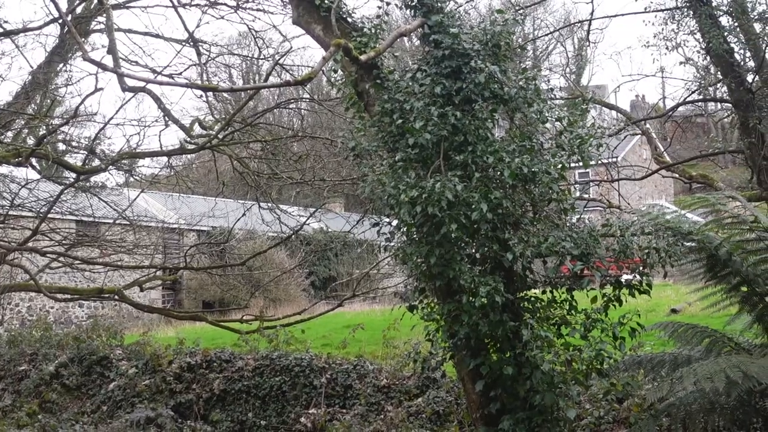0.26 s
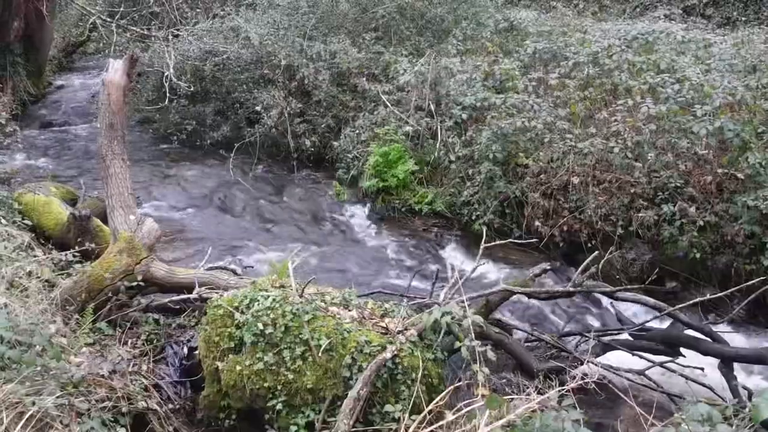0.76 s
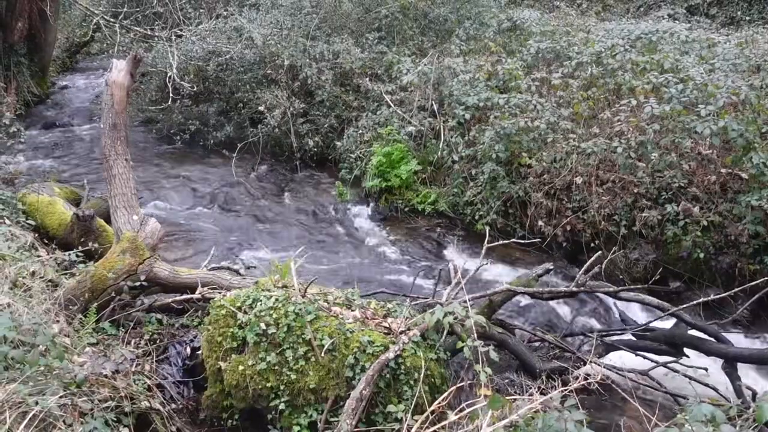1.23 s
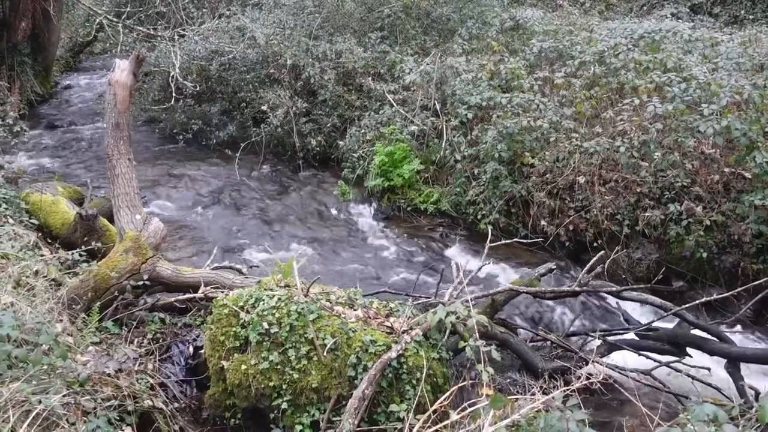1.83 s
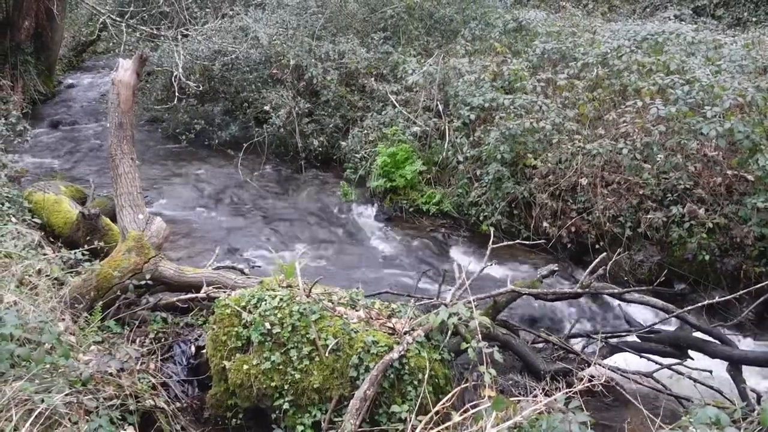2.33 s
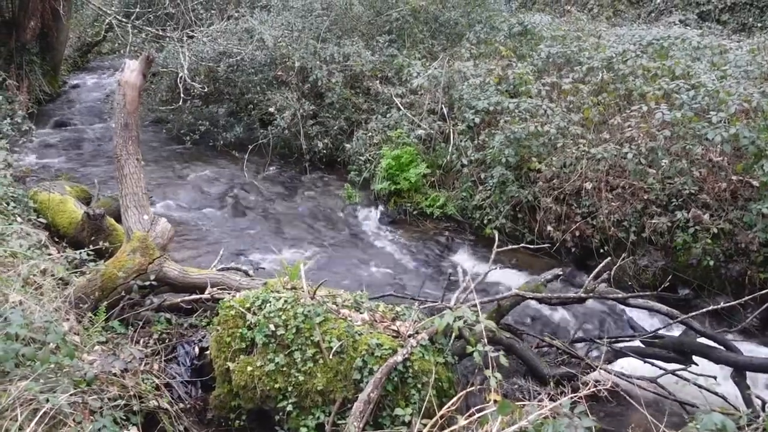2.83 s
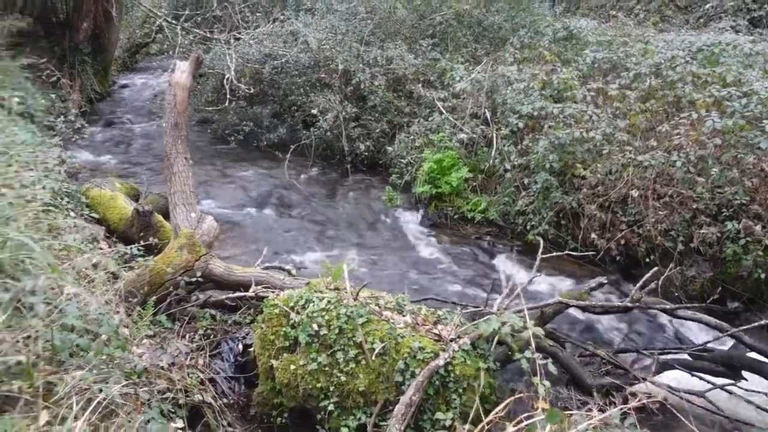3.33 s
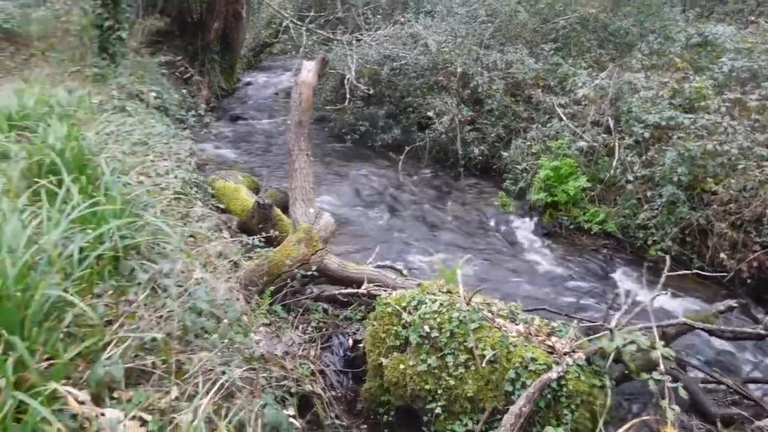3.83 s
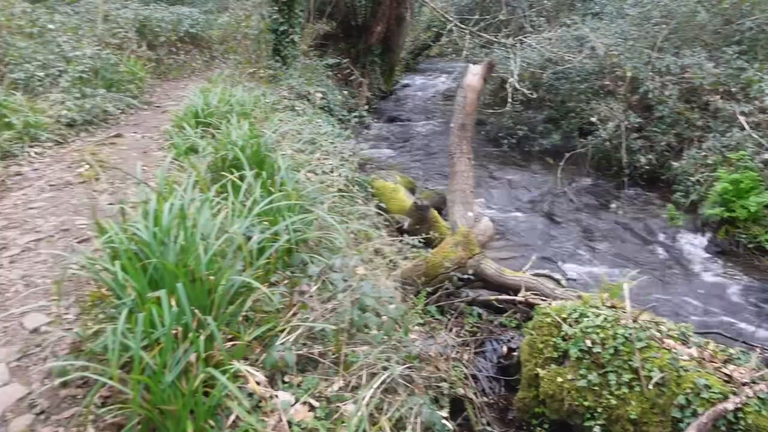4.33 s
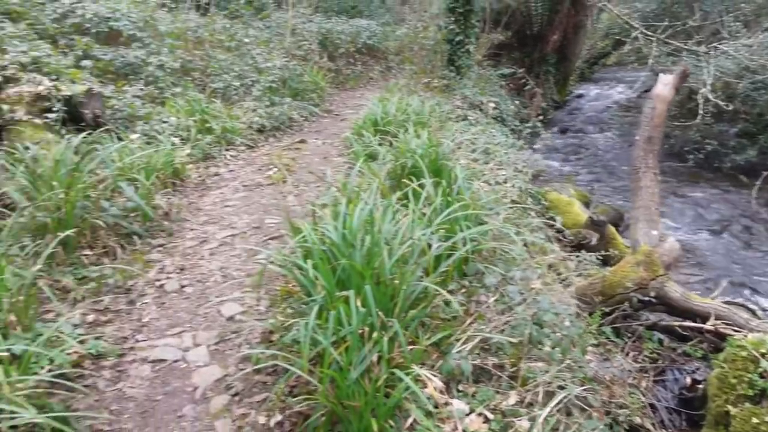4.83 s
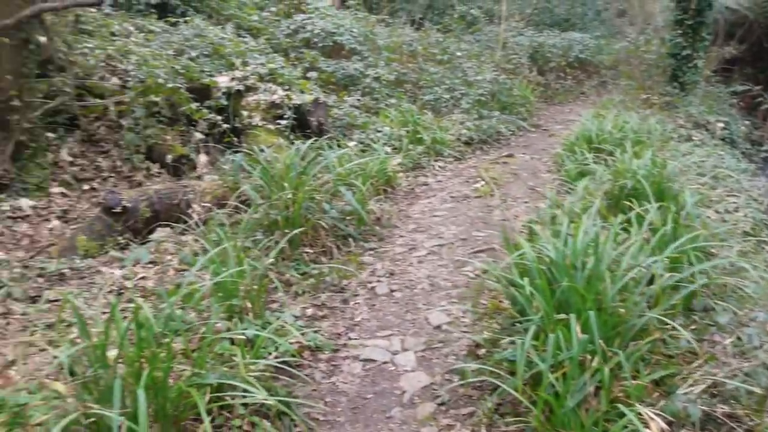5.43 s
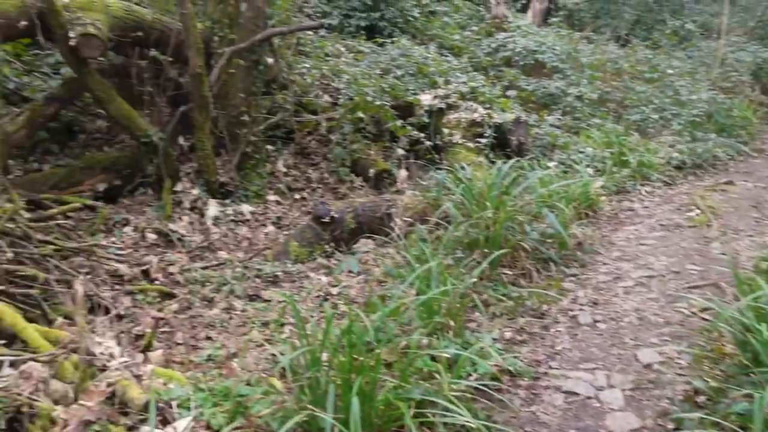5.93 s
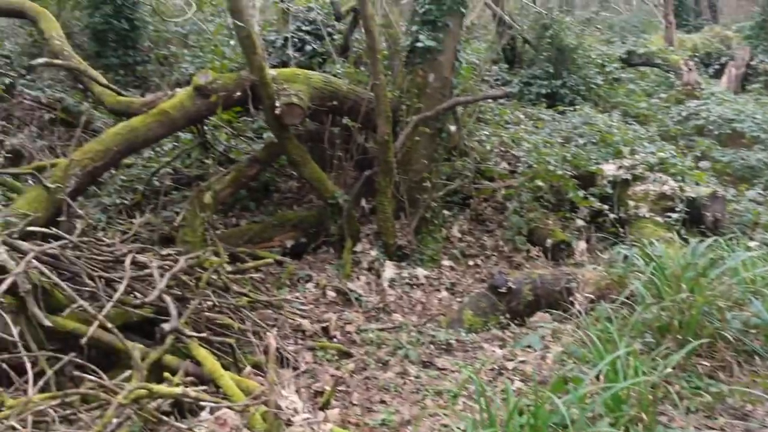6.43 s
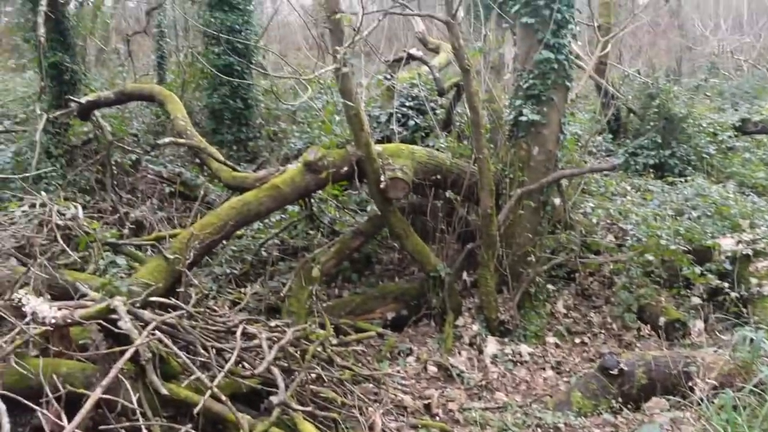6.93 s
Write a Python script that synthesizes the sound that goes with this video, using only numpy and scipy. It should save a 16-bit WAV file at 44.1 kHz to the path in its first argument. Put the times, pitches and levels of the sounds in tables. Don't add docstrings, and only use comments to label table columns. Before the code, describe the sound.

Continuous rushing water outdoors, heard through a camera with the bass cut. A short opening from the bank dips almost silent at half a second, then brighter, louder stream sound returns from close by. Rounded bubble gurgles, light rock splashes and tiny drop or twig ticks poke out of the dense rush. As the view swings toward the path and trees, the stream leans strongly right, loses treble and softens gradually.

```python
import sys
import numpy as np
from scipy import signal
from scipy.fft import rfft, irfft
from scipy.io import wavfile
from scipy.ndimage import uniform_filter1d, map_coordinates

SR = 44100
rng = np.random.default_rng(int(sys.argv[2]) if len(sys.argv) > 2 else 0)


def log_audio(samples):
    frames = np.atleast_2d(samples).T
    limited = np.clip(frames, -1, 1)
    pcm = np.round(limited * 32767).astype(np.int16)
    wavfile.write(sys.argv[1], SR, pcm)


def gain_from_db(level_db):
    decades = np.asarray(level_db, float) / 20
    return 10 ** decades


N = 316197
FRAME = 1024


def unit(x):
    return x / np.sqrt(np.mean(np.abs(x) ** 2) + 1e-20)


def along(points, hz):
    f, *cols = np.transpose(points)
    return np.array([np.interp(np.log(hz + 1), np.log(f + 1), c) for c in cols])


def wobble(rate_hz):
    knots = rng.standard_normal(int(N * rate_hz / SR) + 4)
    return map_coordinates(knots, [np.arange(N) * rate_hz / SR])


def stream():
    surge = .4 * wobble(14) + .6 * wobble(30)
    surge = surge - uniform_filter1d(surge, size=SR // 4)
    near, far = water(surge), water(surge)
    hz = np.fft.rfftfreq(FRAME, 1 / SR)
    t = np.arange(near.shape[1]) * FRAME / 2 / SR
    frames = np.minimum(t * SR, N - 1).astype(int)
    on_bank = t < EDIT[0]

    colour_db, balance_db, alike = listening(t, on_bank, hz)
    level_db = flow(t, frames) + spray_and_pool(t, frames, on_bank, hz)
    shade = gain_from_db(balance_db.real)
    apart = np.sqrt(np.abs(1 - np.abs(alike) ** 2))
    centre = np.sqrt(np.abs(1 + shade * alike) ** 2 + (shade * apart) ** 2) / 2
    gain = gain_from_db(colour_db.real + level_db - 0.9) / centre
    left = shade * (alike * near + apart * far)
    pair = gain * np.array([left, near])
    return gain_from_db(0.36 * surge) * signal.istft(pair, nperseg=FRAME)[1][:, :N]


def water(surge):
    clumps = gain_from_db(.9 * surge)
    gurgle = grains(700, 385.0, 1565, cycles=10.4, rise=0.242, scatter_db=1.0, clumps=clumps)
    babble = grains(3000, 1118, 4880, cycles=14.0, rise=0.04, scatter_db=2.5, clumps=clumps)
    fizz = grains(9000, 4000, 14500, cycles=2.0, rise=.15, scatter_db=5.3, clumps=clumps)
    slaps = grains(900, 723, 4570, cycles=1.7, rise=0.16, scatter_db=2.0, clumps=clumps)
    bubbles_mix = gain_from_db(-22) * gurgle + gain_from_db(-20.5) * slaps + .18 * babble + gain_from_db(-14.5) * fizz

    roar = signal.stft(rng.standard_normal(N), nperseg=FRAME)[2]
    patches = uniform_filter1d(rng.standard_normal(roar.shape), size=12, axis=0)
    patches = uniform_filter1d(patches, size=3, axis=1)
    patches = patches - uniform_filter1d(patches, size=22, axis=1)
    return roar * gain_from_db(0.59 * unit(patches)) + signal.stft(bubbles_mix, nperseg=FRAME)[2]


def grains(count, low_hz, high_hz, cycles, rise, scatter_db, clumps):
    draw = rng.random((count, 4))
    start = np.searchsorted(np.cumsum(clumps) / np.sum(clumps), draw[:, 0])
    hz = (low_hz * (high_hz / low_hz) ** draw[:, 1])[:, None]
    size = hz * gain_from_db(-scatter_db * np.log(1.02 - draw[:, 2:3]))
    step = np.arange(int(2.5 * cycles * SR / low_hz))
    age = step * hz / SR / cycles
    phase = 2 * np.pi * cycles * (age + rise * age ** 2 / 2)
    tone = size * np.sin(phase) * np.exp(-2.2 * age) * (1 - np.exp(-9 * age))
    return unit(np.bincount((start[:, None] + step).ravel(), tone.ravel(), N)[:N])


# (time [s], flow [dB])
BANK_FLOW = [
    (0, -26.5),
    (.12, -25.5),
    (.3, -27),
    (.49, -27.5),
]
# (time [s], flow [dB])
CLOSE_FLOW = [(.6, -24.5), (.85, -26), (1.3, -25), (1.6, -25), (2, -25), (2.6, -25.5), (3.2, -26),
              (3.6, -25.5), (4, -26), (4.5, -26.5), (5, -26), (5.5, -27.5), (6.1, -28), (6.4, -29),
              (6.7, -29.5), (7.15, -30)]


def flow(t, frames):
    return np.interp(t, *np.transpose(BANK_FLOW + CLOSE_FLOW)) - 0.15 * wobble(5.2)[frames]


# (time [s], spray [dB])
SPRAY = [(.6, 0.2), (1.1, 0.6), (1.7, -0.1), (2.3, 0), (3, 1), (3.6, 0.4), (4.2, 0), (4.7, -0.5),
         (5.1, -1.5), (5.5, -0.5), (5.8, -0.7), (6.4, -1.5), (7.1, -1)]


def spray_and_pool(t, frames, on_bank, hz):
    octaves = np.log2(hz[:, None] / 1000 + 1e-3)
    spray_db = np.where(on_bank, 1.5, np.interp(t, *np.transpose(SPRAY))) + 0.48 * wobble(22)[frames]
    pool_db = np.where(on_bank, 3, -1.64) + 1.24 * wobble(7)[frames]
    return spray_db * np.clip(octaves / 3, 0, 1) + pool_db * np.clip(-octaves, 0, 1)


# (time [s], turn [0-1])
TURN_AWAY = [(.56, 0.02), (3.1, 0.06), (3.8, 0.28), (4.3, 0.47), (4.8, 0.67), (5.3, 0.83), (5.8, 1.02),
             (6.3, 1.05), (6.7, 0.95), (7.17, 1)]
# (frequency [Hz], density [dB per Hz])
BANK_TONE = [(53, -73), (90, -46), (314, -12.5), (357, -14.5), (398, -15), (443, -15), (697, -3.5),
             (963, 1), (1190, -7), (1480, -4), (3290, -14), (3580, -14), (6410, -22.5), (12000, -34.5),
             (15500, -45)]
FACING_TONE = [(53, -77), (90, -33), (237, -20.5), (276, -11), (373, -13), (463, -12.5), (540, -9),
               (626, -3), (810, -0.5), (1170, -8.5), (1420, -6.5), (2230, -12), (3150, -11.5), (4100, -15),
               (5200, -19.5), (7950, -24.5), (12200, -34), (15500, -43)]
ASIDE_TONE = [(53, -84), (90, -36), (209, -25), (242, -18), (321, -11), (494, -7), (712, -5.5), (828, -4),
              (983, -4.5), (1220, -8), (1550, -8), (2830, -11.5), (6840, -25), (13300, -39), (15500, -45)]
# (frequency [Hz], left minus right [dB], likeness [0-1], left lead [rad])
BANK_EARS = [(90, -2.8, 0.85, 0.0), (210, -2.2, 0.99, -0.4), (390, -2.9, 0.98, -0.4),
             (630, -3.3, 0.96, -0.5), (980, -4.0, 0.95, -0.4), (1550, -3.1, 0.88, -0.4),
             (2450, -2.5, 0.86, -0.4), (3590, -2.9, 0.78, -0.2), (4540, -3.1, 0.68, -0.0),
             (5590, -2.0, 0.7, 0.0), (7650, -0.1, 0.73, 0.1), (10170, -0.0, 0.94, 0.0),
             (12230, 0.1, 0.93, 0.0), (14200, 0.1, 0.99, 0.0)]
FACING_EARS = [(90, -2.5, 0.96, -0.0), (210, -2.4, 0.98, -0.3), (390, -4.1, 0.98, -0.2),
               (630, -4.6, 0.97, -0.2), (980, -6.2, 0.97, -0.1), (1550, -5.7, 0.95, -0.0),
               (2450, -5.7, 0.97, 0.0), (3590, -5.3, 0.97, -0.0), (4540, -5.9, 0.88, -0.1),
               (5590, -6.3, 0.7, 0.1), (7650, -4.7, 0.68, 0.5), (10170, -2.4, 0.61, 0.4),
               (12230, -0.6, 0.8, 0.1), (14200, -0.0, 1.0, 0.0)]
ASIDE_EARS = [(90, -4.0, 0.93, -0.0), (210, -3.0, 0.98, -0.2), (390, -4.7, 0.98, -0.2),
              (630, -7.9, 0.96, -0.1), (980, -9.3, 0.92, 0.1), (1550, -8.0, 0.87, 0.3),
              (2450, -10.3, 0.83, 0.3), (3590, -12.3, 0.45, 0.4), (4540, -11.1, 0.06, 0),
              (5590, -9.2, 0.22, -3.1), (7650, -8.0, 0.24, 2.0), (10170, -7.6, 0.21, -2.8),
              (12230, -1.6, 0.53, -3.0), (14200, -0.2, 0.02, 0)]


def listening(t, on_bank, hz):
    turn = np.clip(np.interp(t, *np.transpose(TURN_AWAY)), 0, 1.15)
    facing = position(FACING_TONE, FACING_EARS, hz)
    aside = position(ASIDE_TONE, ASIDE_EARS, hz)
    swung = (1 - turn) * facing + turn * aside
    return np.where(on_bank, position(BANK_TONE, BANK_EARS, hz), swung)


def position(tone, ears, hz):
    colour_db = along(tone, hz)[0]
    colour_db = colour_db - 10 * np.log10(np.mean(gain_from_db(2 * colour_db)))
    balance_db, alike, lead_rad = along(ears, hz)
    likeness = np.clip(alike, 0, 1) * np.exp(1j * lead_rad)
    return np.array([colour_db, balance_db, likeness])[:, :, None]


# (time [s], peak [dB], pitch [Hz])
SINGLE_BUBBLES = [(1.518, -24, 466), (1.522, -15, 665), (1.66, -31, 282), (1.761, -16, 795), (3.245, -35, 330),
                  (3.7, -17.5, 654), (5.572, -17.5, 920), (5.599, -24, 990), (5.538, -22, 1560),
                  (5.616, -23, 1700), (1.453, -19, 790), (1.528, -21, 760), (1.705, -22, 760),
                  (5.591, -27.5, 343), (6.899, -52, 328), (6.927, -19.5, 820)]
# (time [s], peak [dB], pitch [Hz])
MORE_BUBBLES = [(0.107, -7, 880), (0.127, -24, 920), (0.806, -7, 750), (0.953, -14, 796),
                (1.153, -17, 760), (1.497, -20, 805), (1.551, -9, 790), (2.124, -20, 880),
                (2.501, -26, 840), (2.613, -27, 900), (2.683, -8, 720), (2.846, -24, 904),
                (2.924, -10, 706), (3.269, -6, 860), (3.407, -9, 870), (3.502, -10, 713),
                (3.663, -14, 750), (3.722, -6, 746), (3.748, -18, 810), (3.77, -16, 820), (3.87, -21, 905),
                (4.022, -26, 1090), (4.116, -6, 790), (4.215, -11, 923), (4.681, -13, 870),
                (4.752, -9, 799), (4.875, -13, 780), (5.867, -15, 706), (6.038, -10, 1120),
                (6.209, -11, 1400), (6.291, -10, 1430), (6.701, -14, 830), (5.378, -14, 760),
                (6.095, -10, 1240), (6.11, -16, 1010), (6.15, -18, 806), (6.235, -19, 644),
                (6.265, -11, 1110), (6.275, -18, 695), (6.99, -12, 830), (7.031, -18, 999)]
# (time [s], peak [dB], pitch [Hz])
ROCK_SPLASHES = [(1.0246, -12, 2890), (1.498, -6, 2590), (2.6783, -23, 3130), (3.154, -3, 3240),
                 (3.247, -9, 1750), (3.9489, -11, 1990), (4.1755, -16, 1570), (5.3562, -21, 1560),
                 (6.589, -8, 1620), (6.645, -18, 1660), (7.0394, -14, 1800), (1.2778, -8, 2500),
                 (1.7432, -17, 2540), (2.0061, -8, 3040), (2.3748, -17, 2380), (2.592, -6, 2520),
                 (2.7479, -18, 3520), (2.9665, -9, 2490), (3.2967, -17, 2990), (3.3571, -16, 3190),
                 (3.6943, -13, 3350), (4.0021, -15, 2250), (4.1308, -16, 3350), (4.4945, -13, 2530),
                 (4.9185, -11, 2240), (5.1445, -19, 2340), (6.1278, -16, 2300), (6.6426, -6.5, 2980),
                 (6.783, -13, 3500), (0.568, -14, 2670), (1.516, -15, 2720)]


def bubbles():
    out, t = np.zeros(N + SR), np.arange(SR // 10) / SR
    for events, share_db in [(SINGLE_BUBBLES, 0), (MORE_BUBBLES, -10.5), (ROCK_SPLASHES, -12)]:
        for s, db, hz in events:
            age = t * hz / 3.45
            phase = 2 * np.pi * hz * t * (0.953 + 0.036 * age)
            ring = np.sin(phase) * np.exp(-age) * (1 - np.exp(-3 * age))
            out[round(s * SR):][:len(t)] += gain_from_db(db + share_db + 4.0) * ring
    return out[:N] * gain_from_db([[-2.5], [2.2]])


# (time [s], peak [dB], pitch [Hz], left minus right [dB])
SNAPS = [(.163, -35, 7300, -1), (0.377, -43, 10900, 0), (1.143, -36, 7340, -7), (1.514, -32, 4030, -5),
         (1.918, -38, 7800, -5), (2.008, -49, 4000, -5), (3.655, -40, 8000, -8), (4.714, -41, 8900, -10),
         (4.7145, -41, 7400, -10), (4.922, -46, 11200, -7), (4.921, -50, 13800, -7),
         (4.9215, -48, 12500, -7), (6.785, -42, 4000, -10)]


def snaps():
    out, t = np.zeros((2, N + SR)), np.arange(SR // 100) / SR
    for s, db, hz, pan_db in SNAPS:
        ring = np.sin(2 * np.pi * hz * t + np.cumsum(rng.normal(0, .38, len(t))))
        snap = ring * np.exp(-t / .0008) * (1 - np.exp(-t / .0003)) ** 2
        sides = gain_from_db([[pan_db / 2], [-pan_db / 2]])
        out[:, round(s * SR):][:, :len(t)] += gain_from_db(db + 21.0) * sides * snap
    return out[:, :N]


# (frequency [Hz], density [dB per Hz])
AIR_RUMBLE = [(15, -20), (30, -8), (60, -1), (100, 6), (140, -13), (200, -40), (300, -90)]


def rumble():
    hz = np.fft.rfftfreq(N, 1 / SR)
    shaped = rfft(rng.standard_normal((2, N))) * gain_from_db(along(AIR_RUMBLE, hz)[0])
    mid, side = irfft(shaped, N)
    return gain_from_db(-84 + 1.1 * wobble(4.4)) * (unit(mid) + np.array([[.15], [-.15]]) * unit(side))


def scene():
    return stream() + bubbles() + snaps()


def band_limit(x):
    return signal.sosfilt(signal.butter(12, 15690, fs=SR, output="sos"), x)


# (silent moment [s], fade out [s], fade in [s])
EDIT = (0.5325, 0.036, 0.035)


def record(dry):
    wind_filter = signal.butter(N=4, Wn=170, btype="high", fs=SR, output="sos")
    heard = signal.sosfilt(wind_filter, dry) + rumble()
    silent_s, out_s, in_s = EDIT
    t = np.arange(N) / SR - silent_s
    fade = np.clip(np.where(t < 0, -t / out_s, t / in_s), .07, 1)
    mix = heard * np.sin(np.pi * fade / 2) ** np.where(t < 0, 1.6, 2.1)
    return band_limit(mix)


dry = scene()
out = record(dry)
log_audio(out)
```